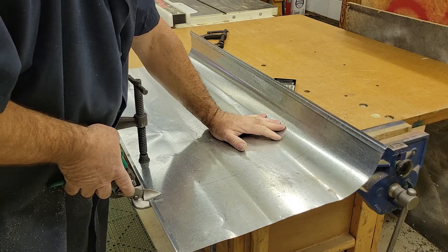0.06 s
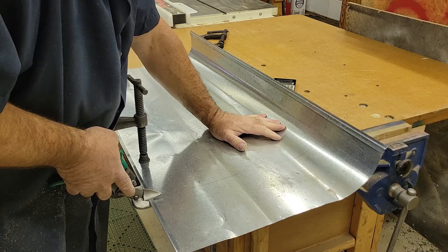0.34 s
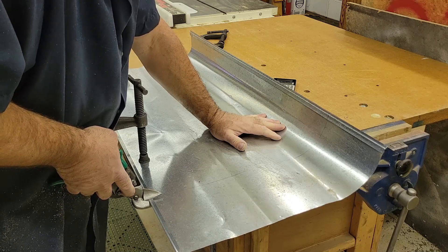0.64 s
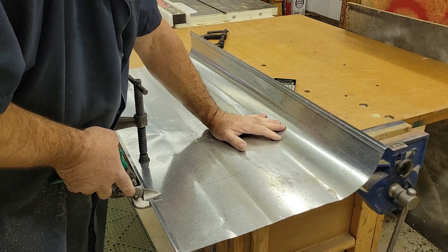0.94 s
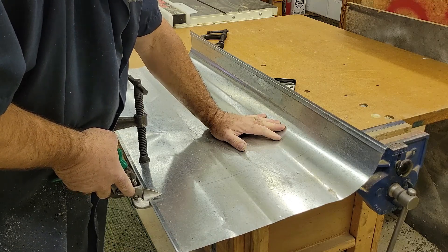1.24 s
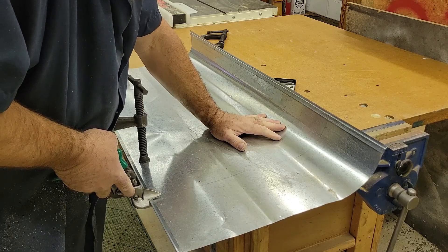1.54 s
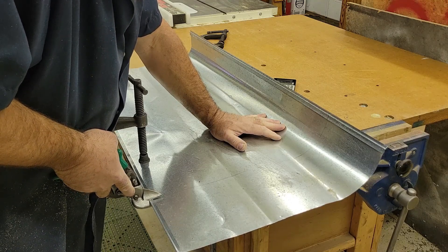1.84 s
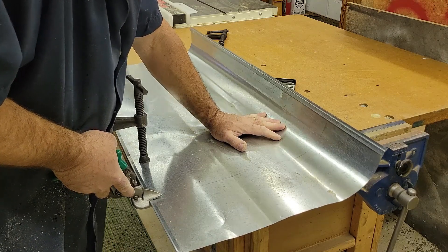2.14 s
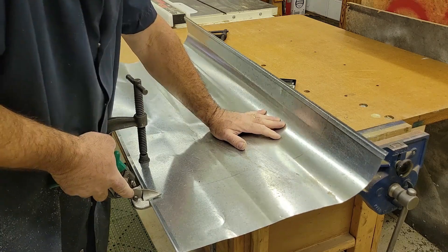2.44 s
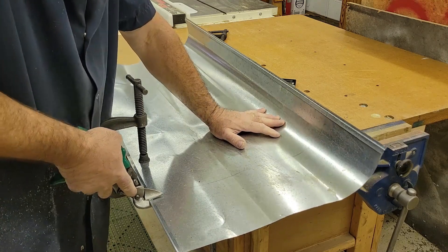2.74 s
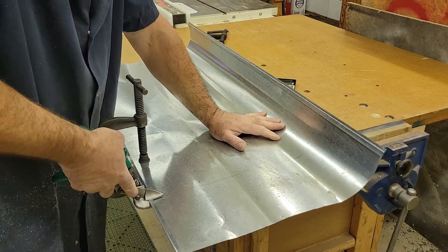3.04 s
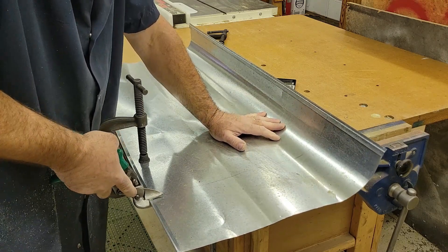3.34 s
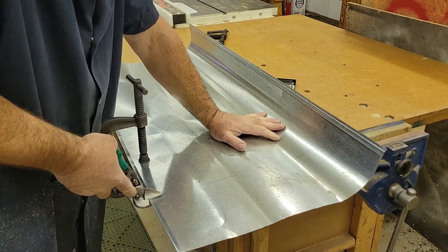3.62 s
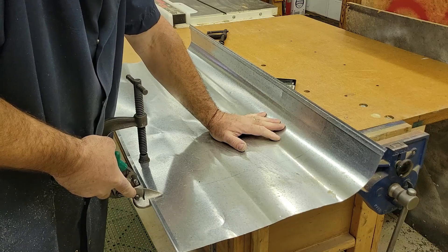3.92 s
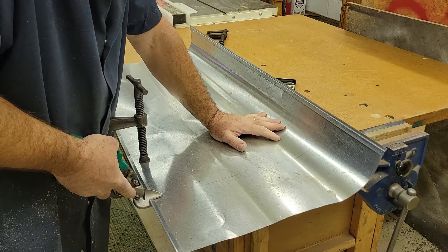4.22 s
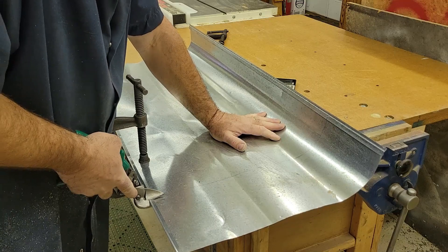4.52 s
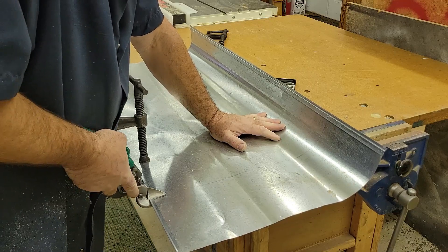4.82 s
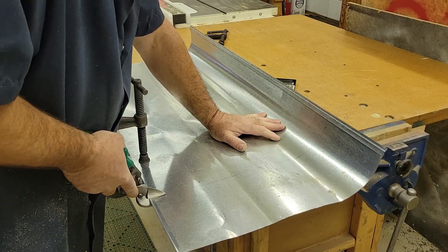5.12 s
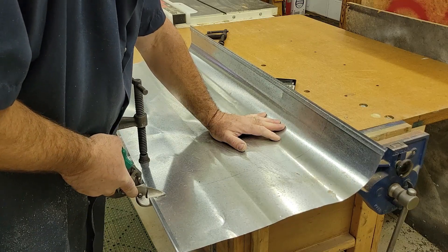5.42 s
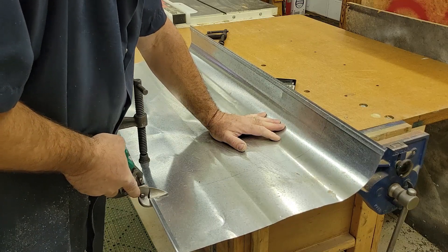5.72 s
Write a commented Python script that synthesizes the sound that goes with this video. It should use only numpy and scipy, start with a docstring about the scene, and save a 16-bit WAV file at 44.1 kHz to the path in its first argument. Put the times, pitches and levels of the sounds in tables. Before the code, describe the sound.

Tin snips cut thin sheet metal with two sharp, ringing snaps, after the sheet creaks and pops on a workbench.

```python
"""Tin snips cut a thin steel sheet, held flat by hand on a workbench in a small workshop.
Twice the blades snap through: a sharp crack and a bright clang of dense steel modes.
Before that the sheet buckles with two loud pops and rattles on the bench. Throughout, it creaks
by stick and slip in the jaws, bumps as it flexes, and the blades click, tick and rub on the cut edge.
Behind it, air moves and a motor hums."""
import sys
import numpy as np
from scipy import signal
from scipy.fft import rfft, irfft, next_fast_len
from scipy.io import wavfile

SR = 44100
rng = np.random.default_rng(int(sys.argv[2]) if len(sys.argv) > 2 else 0)


def transcribe(signal):
    """Save signal, clipped to [-1, 1], as a 16-bit WAV file at the path in sys.argv[1]."""
    frames = np.atleast_2d(signal).T
    limited = np.clip(frames, -1, 1)
    pcm = np.round(limited * 32767).astype(np.int16)
    wavfile.write(sys.argv[1], SR, pcm)


N = 258867
AGE_S = np.arange(SR) / SR
ATTACK_SAMPLES = int(.04 * SR)
EDGES_HZ = 16500 / 2 ** (np.arange(19, -1, -1) / 2)
BANDS_HZ = np.sqrt(EDGES_HZ[1:] * EDGES_HZ[:-1])
LEFT_RIGHT = np.array([[1], [-1]])

# Table levels are relative: each source adds its own gain or colour.
# Each row: start, swell and early T60 in seconds, level in dB, tilt in dB per octave.
SNIPS_AND_JAW_CLICK = [(3.8107, 0.013, 0.14, -21, 0), (4.6047, .001, 0.075, -77, 7),
                       (5.171, 0.0025, 0.14, -39.5, 1.8)]
# Each row: start in seconds, level in dB, decay time constant in seconds.
SHARP_CRACKS = [(1.427, -49, .001), (1.9506, -34, 0.0018), (2.4457, -41, .002), (2.933, -51, 0.0013),
                (3.8103, -9, .0016), (4.607, -35, 0.0016), (5.171, -20, 0.0019)]
# Each row: start, swell and early T60 in seconds, level in dB, bulge pitch in Hz, its boost in dB,
# its width in octaves, thump pitch in Hz, thump level in dB.
BUCKLES = [(1.947, 0.0057, .14, -34.5, 1150, 15, 0.96, 94.8, -24.5),
           (2.444, 0.002, 0.12, -39.5, 450, 8.5, 1.13, 146, -17)]
# Each row: start and length in seconds, level in dB, tilt in dB per octave.
JAW_SLIPS = [(.084, .015, -61, -0.5), (.376, 0.0079, -70, 1.5), (.815, .025, -63.5, -1.5),
             (.976, .025, -61.5, 1.7), (1.426, 0.0046, -52.5, -0.1), (1.706, .01, -66.5, 2.5),
             (1.805, 0.0055, -55.5, 0.5), (1.879, .03, -30.5, -1.25), (1.922, 0.011, -34, -4.4),
             (2.932, .002, -49.5, -1), (2.985, .02, -55.5, -2), (3.423, .045, -60.5, 0.4),
             (3.569, .01, -63, 0.5), (3.703, .02, -54, -.5), (4.55, .04, -61.5, -2), (4.787, .022, -51, .5),
             (5.723, 0.036, -48.5, 0.9), (5.78, .035, -48.5, -.5)]
# Each row: start and length in seconds, level in dB, pitch in Hz.
BUMPS_AND_RINGS = [(.72, 0.0037, -62.5, 400), (.903, 0.024, -54.5, 550), (1.052, 0.025, -56, 496),
                   (1.149, 0.011, -57.5, 650), (1.428, 0.0033, -53, 776), (1.539, 0.003, -51.5, 710),
                   (1.807, 0.0017, -56, 794), (1.885, 0.033, -30.5, 104.7), (2.14, .1, -42, 262),
                   (2.385, 0.051, -42.5, 420), (2.932, 0.0044, -53.5, 277), (4.461, 0.048, -57, 280),
                   (4.6, 0.025, -54, 107), (4.835, 0.026, -50.5, 139), (5.765, 0.034, -58, 169)]
# Each row: start in seconds, level in dB.
BLADE_TICKS = [(.449, -75.5), (.717, -72), (.768, -70), (.905, -69), (.945, -72), (1.149, -73),
               (1.295, -74), (1.494, -67), (3.337, -70), (3.531, -72.5), (4.463, -71.5)]
# Each row: midpoint and length in seconds, level in dB.
JAW_PUSHES = [(0.206, 0.27, -79.5), (0.945, 0.72, -77), (1.546, 0.2, -76), (2.807, 0.24, -65),
              (3.551, 0.96, -81), (4.6, 0.31, -69.5), (5.79, 0.26, -71)]
# Modes of the snips with the strip they grip, and of the sheet.
# Each row: frequency in Hz, level in dB, T60 in seconds.
SNIP_MODES = [(165, 4.5, .4), (291, 9.5, 0.49), (1533, -8, .33), (1953, -8, 0.82), (2323, -4.5, 0.41),
              (2540, -2.5, .27), (2818, -10.5, .33), (3470, -4, 0.3), (3670, -4.5, 0.34),
              (4050, -17.5, 0.7), (4250, 1, .33), (4690, -4, .55), (5500, -11, 0.23), (5540, -7.5, 0.33),
              (6570, -4, .15), (6900, -11.5, 0.4), (7700, -17, .32), (8440, -8, .2), (9140, -0.5, .26),
              (10090, -13.5, 0.13), (12000, -11, .24), (13200, -7.5, 0.24)]
PLATE_MODES = [(63.5, 3, .5), (88.4, 7, 1.3), (165.2, 8, 0.98), (189.5, 8.5, .25), (276, 2.5, 0.36),
               (408.3, -2.5, 0.67), (467, -2, 0.74), (551, -3, 0.1), (611.4, 0.5, .55), (735, 0, 0.58),
               (831, -3, 0.77), (916, -8.5, .55), (1030, -1, 0.25), (1083, -5, 0.15), (1331, 1, 0.32),
               (1516, -9.5, 0.43), (1590, -6.5, 0.092), (1760, -8, 0.69), (2470, -5.5, 0.36)]
# Ring-down of sheet and room together. Each row: frequency in Hz, T60 in seconds.
RING_DOWN = [(60, 0.31), (150, 0.75), (400, 0.62), (1000, 0.73), (2500, 0.73), (4200, 0.61), (7000, 0.46),
             (10000, .4), (15000, 0.27)]
# Clumping of the dense modes. Each row: frequency in Hz, level spread in dB.
MODE_CLUMPS = [(300, 2.95), (1200, 1.5), (3500, 5), (14000, 3.5)]
# Each row: frequency in Hz, side minus mid in dB.
STEREO_WIDTH = [(60, -15.5), (120, -20), (250, -13), (400, -10), (700, -3), (1300, -0.5), (2400, -1.5),
                (4400, 1), (15000, 0)]
# Each row: frequency in Hz, left minus right in dB.
STEREO_LEAN = [(60, 3), (600, 0.8), (1300, 0), (4500, -0.7), (7000, 1), (9500, 8.5), (13000, -5.5)]
# Each row: frequency in Hz, spectral density in dB.
ROOM_AIR = [(15, -48), (25, -16), (157, -8), (229, -10.5), (335, -5), (405, -8), (531, -15), (962, -14.5),
            (1160, -25), (1650, -25), (2220, -22), (5140, -40.5), (5730, -41), (12900, -37.5),
            (16000, -42.5)]
# Each row: frequency in Hz, level in dB.
MOTOR_LINES = [(172.3, -73), (231.5, -69), (290.7, -70.5), (403.7, -67.5), (463.0, -78), (635.2, -76.5),
               (899.0, -90.5), (958.2, -78), (1798, -86), (2218, -83.5)]
# Source colours. Each row: frequency in Hz, band gain in dB.
SNIP_COLOUR = [(28, -64.5), (60, -42.5), (155, -29), (217, -34), (307, -12), (434, -24.5), (900, -15),
               (1500, -7), (2300, -2), (3500, .2), (5000, -4.6), (7000, -7.3), (14000, -2.5)]
POP_COLOUR = [(28, -43), (55, -12.5), (108, -5), (155, -2.5), (230, -.5), (430, -1), (620, 4),
              (870, .1), (1250, 4), (2450, 1.3), (4500, 1.5), (7000, -.3), (14000, -2.9)]
RATTLE_COLOUR = [(28, -49), (80, -24), (160, -12.5), (300, 3), (620, 2), (1250, -5.5), (2200, 7),
                 (5000, -5.5), (14000, -2.5)]
CREAK_COLOUR = [(28, -51.5), (60, -29), (110, -16), (200, -12.5), (400, -4), (750, -1.4), (1300, -4),
                (1900, -4.5), (4000, -11.5), (6500, -17.5), (14000, -13)]
BUMP_COLOUR = [(28, -11.5), (80, -5), (200, 3.5), (700, -.5), (3000, -3), (14000, -1)]
TICK_COLOUR = [(28, -35), (100, -11.5), (200, -3.5), (650, 3.5), (1500, -8), (4000, -8), (6500, -7),
               (10000, -2), (14000, -2)]
RUB_COLOUR = [(30, -30), (300, -4.5), (700, 1), (2500, 3.5), (6000, -6.5), (9000, -.5), (14000, -2.2)]


def snips(dense):
    """Two cuts set the steel clanging; between them the jaws give one faint, bright click."""
    out = np.zeros((2, N))
    for start_s, swell_s, early_t60_s, db, db_per_octave in SNIPS_AND_JAW_CLICK:
        body = steel(dense, SNIP_MODES, swell_s, early_t60_s, tail_db=-4.5, modes_db=0)
        add(out, start_s, strike(body, db + tilt_db(db_per_octave), SNIP_COLOUR))
    return out


def steel(dense, modes, swell_s, early_t60_s, tail_db, modes_db):
    """Struck steel by band: dense modes swell, drop fast, then linger, with clear modes on top."""
    # Long bending waves travel slowly: the bass swells later.
    band_swell_s = swell_s * (np.maximum(BANDS_HZ, 600)[:, None] / 2000) ** -.25
    swell = 1 - np.exp(-AGE_S / band_swell_s)
    ring_t60_s = at_hz(RING_DOWN, BANDS_HZ)[:, None]
    drop_t60_s = early_t60_s * ring_t60_s / np.median(ring_t60_s)
    fade = from_db(-60 * AGE_S / drop_t60_s) + from_db(tail_db - 60 * AGE_S / ring_t60_s)
    bands = unit_attack(dense * (fade * swell)[:, None])
    for hz, db, t60_s in modes:
        # Short waves reach the two ears in different phase.
        phase = rng.uniform(0, 2 * np.pi)
        ear_phase = from_db(at_hz(STEREO_WIDTH, hz)) * rng.choice([-1, 1]) * LEFT_RIGHT * np.pi / 4
        band = np.argmin(abs(np.log(BANDS_HZ / hz)))
        envelope = np.sqrt(2) * from_db(db + modes_db - 60 * AGE_S / t60_s) * swell[band]
        bands[band] += envelope * np.sin(2 * np.pi * hz * AGE_S + phase + ear_phase)
    return unit_attack(bands)


def strike(body, levels_db, colour):
    """A blow drives some bands of the body harder than others."""
    return np.tensordot(from_db(levels_db + at_hz(colour, BANDS_HZ)), body, axes=1)


def cracks(peak_hz=13300, rise_s=.0005, broadband_db=-10, lean_db=-2):
    """Sharp, bright cracks a few milliseconds long, at the cuts, pops and jaw clicks."""
    out, age_s = np.zeros((2, N)), AGE_S[:ATTACK_SAMPLES]
    for start_s, db, decay_s in SHARP_CRACKS:
        noise = rng.standard_normal(ATTACK_SAMPLES) + .3 * rng.standard_normal((2, ATTACK_SAMPLES))
        burst = noise * np.exp(-age_s / decay_s) * (1 - np.exp(-age_s / rise_s))
        peak = signal.lfilter(*signal.iirpeak(peak_hz, Q=2.5, fs=SR), burst)
        add(out, start_s, from_db(db) * (2 * peak + from_db(broadband_db) * burst))
    return out * from_db(lean_db / 2 * LEFT_RIGHT)


def pops(dense, spots, rebounds=4, wait_s=.055, spacing_s=.065, rattle_s=.035, loss_db=7):
    """The sheet snaps between bulges with a hollow bang, then rebounds ever weaker on the bench."""
    out = np.zeros((2, N))
    for start_s, swell_s, early_t60_s, db, bulge_hz, boost_db, octaves, thump_hz, thump_db in BUCKLES:
        levels_db = db + boost_db * bell(bulge_hz, octaves)
        body = steel(dense, PLATE_MODES, swell_s, early_t60_s, tail_db=-8, modes_db=-4)
        add(out, start_s, strike(body, levels_db, POP_COLOUR) + from_db(thump_db) * thump(thump_hz))
        rebound_db = levels_db - 11.5 + tilt_db(-1.87)
        for k in range(rebounds):
            rattle = stick_slip(spots[k % len(spots)], rattle_s, rebound_db - loss_db * k, RATTLE_COLOUR)
            add(out, start_s + wait_s + spacing_s * k, rattle)
    return out


def thump(hz, t60_s=.091, rise_s=.0059):
    """The snapping bulge shoves the air: a few low cycles, centred."""
    envelope = from_db(-60 * AGE_S / t60_s) * (1 - np.exp(-AGE_S / rise_s))
    return np.tile(envelope * np.sin(2 * np.pi * hz * AGE_S), (2, 1))


def creaks(spots):
    """The sheet slips between the squeezing jaws."""
    out = np.zeros((2, N))
    for k, (start_s, length_s, db, db_per_octave) in enumerate(JAW_SLIPS):
        levels_db = db + tilt_db(db_per_octave)
        add(out, start_s, stick_slip(spots[k % len(spots)], length_s, levels_db, CREAK_COLOUR))
    return out


def stick_slip(spot, length_s, levels_db, colour, jerks_per_s=1100, spread_db=6):
    """A first jerk, then uneven ones that swell and fade, shake one spot of the sheet."""
    count = SR // 8
    jerks = rng.random(count) < jerks_per_s / SR
    sizes = from_db(spread_db * np.clip(rng.standard_normal(count), -2, 2))
    stroke = np.sqrt(abs(np.sin(np.pi * np.minimum(AGE_S[:count] / length_s, 1))))
    force = jerks * stroke * sizes * rng.choice([-1, 1], count)
    force[0] = 2.6 * np.exp(-length_s / .064)  # long scrapes start softly
    force /= np.linalg.norm(force)
    return signal.fftconvolve(strike(spot, levels_db, colour), force[None], axes=1)


def sheet_spots(hiss, count=3):
    """Impulse responses by band: each spot of the sheet stirs its own dense modes."""
    spots = []
    for k in range(count):
        dense = hiss[..., k * SR:(k + 1) * SR]
        body = steel(dense, PLATE_MODES, swell_s=.0006, early_t60_s=.057, tail_db=-9, modes_db=-5.5)
        spots.append(body[..., :SR // 2])
    return spots


def bumps_and_rings(spots, depth_db=26):
    """Soft, dull bumps of the sheet, and two short rings near 780 Hz as the blades click."""
    out = np.zeros((2, N))
    for k, (start_s, length_s, db, hz) in enumerate(BUMPS_AND_RINGS):
        levels_db = db + depth_db * (bell(hz, octaves=.55) - 1)
        add(out, start_s, stick_slip(spots[k % len(spots)], length_s, levels_db, BUMP_COLOUR))
    return out


def ticks(spots, length_s=.0024):
    """Blade tips tap the cut edge: thin and bright, with a little sheet body."""
    out = np.zeros((2, N))
    for k, (start_s, db) in enumerate(BLADE_TICKS):
        add(out, start_s, stick_slip(spots[k % len(spots)], length_s, db, TICK_COLOUR))
    return out


def rubbing(hiss, gain_db=-5, grain_db=4, rest_db=-90):
    """Steel slides on steel: faint grit that swells and fades with each push of the jaws."""
    time_s, push = np.arange(N) / SR, from_db(rest_db)
    for middle_s, length_s, db in JAW_PUSHES:
        position = np.clip((time_s - middle_s) / length_s, -.5, .5)
        push = push + from_db(db) * np.cos(np.pi * position) ** 2
    grit = np.roll(strike(hiss, 0, RUB_COLOUR), SR, axis=1)  # shift decorrelates it from the air
    return grit * push * from_db(gain_db + grain_db * drift(230))


def motor(gain_db=.57, waver_db=2, wander_rad=.32):
    """Motor hum: lines that waver slightly in level and phase."""
    time_s, hum = np.arange(N) / SR, 0
    for hz, db in MOTOR_LINES:
        amplitude = np.sqrt(2) * from_db(db + gain_db + waver_db * drift(5.9))
        phase = 2 * np.pi * (hz * time_s + rng.random()) + wander_rad * drift(5.3)
        hum = hum + amplitude * np.sin(phase)
    return hum


def room_air(hiss, rms_db=-62.5):
    """Moving air: steady, dull noise."""
    gains = from_db(at_hz(ROOM_AIR, BANDS_HZ)) * np.sqrt(BANDS_HZ)
    return from_db(rms_db) * unit_rms(np.tensordot(gains, hiss, axes=1))


def noise_bands(samples, clumps):
    """Half-octave bands of stereo noise, rippled by clumps, near mono in the bass."""
    padded = next_fast_len(samples + SR // 4)
    bins_hz = np.arange(1, padded // 2 + 2) * SR / padded
    ripple = np.interp(np.sqrt(bins_hz), np.arange(160), rng.standard_normal(160))
    ripple_db = at_hz(clumps, bins_hz) * np.clip(ripple, -2, 1.5)
    noise = irfft(rfft(rng.standard_normal((2, 2, padded))) * from_db(ripple_db), padded)
    bands = []
    for k, hz in enumerate(BANDS_HZ):
        bandpass = signal.butter(3, EDGES_HZ[k:k + 2], "band", fs=SR, output="sos")
        mid, side = signal.sosfilt(bandpass, noise[k % 2])[:, -samples:]
        pair = mid + from_db(at_hz(STEREO_WIDTH, hz)) * side * LEFT_RIGHT
        bands.append(unit_rms(pair * from_db(at_hz(STEREO_LEAN, hz) / 2 * LEFT_RIGHT)))
    return np.array(bands)


def tilt_db(db_per_octave):
    """Slope about 1 kHz: a sharper contact favours the treble."""
    return db_per_octave * np.log2(BANDS_HZ / 1000)


def bell(hz, octaves):
    """Band weights up to 1, peaked around one pitch."""
    return np.exp(-.5 * (np.log2(BANDS_HZ / hz) / octaves) ** 2)


def drift(points_per_s):
    """Random curve, spread near 1."""
    return np.interp(np.arange(N) / SR * points_per_s, np.arange(2000), rng.standard_normal(2000))


def at_hz(table, hz):
    """Interpolate on a log-frequency axis."""
    points_hz, values = np.array(table).T
    return np.interp(np.log(hz), np.log(points_hz), values)


def from_db(db):
    """Decibels to gain."""
    return 10 ** (db / 20)


def unit_rms(x):
    """Scale to unit power."""
    return x / np.sqrt(np.mean(x ** 2) + 1e-20)


def unit_attack(bands):
    """Scale each band to unit power over the attack."""
    return bands / np.sqrt(np.mean(bands[..., :ATTACK_SAMPLES] ** 2, axis=(1, 2), keepdims=True))


def add(out, start_s, sound):
    """Mix in a stereo sound."""
    start = int(start_s * SR)
    out[:, start:start + sound.shape[1]] += sound[:, :N - start]


def scene():
    """Snips and sheet over the quiet room."""
    dense = noise_bands(len(AGE_S), MODE_CLUMPS)
    hiss = noise_bands(N, clumps=[(1000, 0)])  # no ripple
    spots = sheet_spots(hiss)
    handling = creaks(spots) + ticks(spots) + bumps_and_rings(spots) + rubbing(hiss)
    return pops(dense, spots) + snips(dense) + cracks() + handling + motor() + room_air(hiss)


def record(dry, low_hz=40, high_hz=16300):
    """Deep bass cut, clip at full scale, then the recorder's steep top cut."""
    highpass = signal.butter(2, low_hz, "high", fs=SR, output="sos")
    lowpass = signal.ellip(10, .1, 80, high_hz, fs=SR, output="sos")
    clipped = np.clip(signal.sosfilt(highpass, dry), -1, 1)
    return signal.sosfilt(lowpass, clipped)


dry = scene()
out = record(dry)
transcribe(out)
```